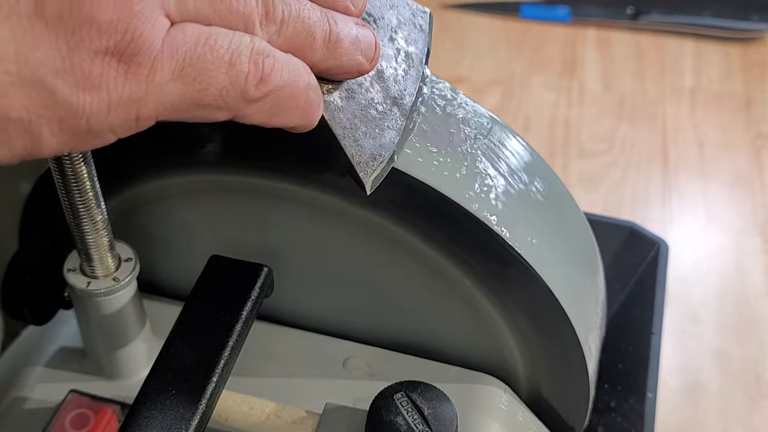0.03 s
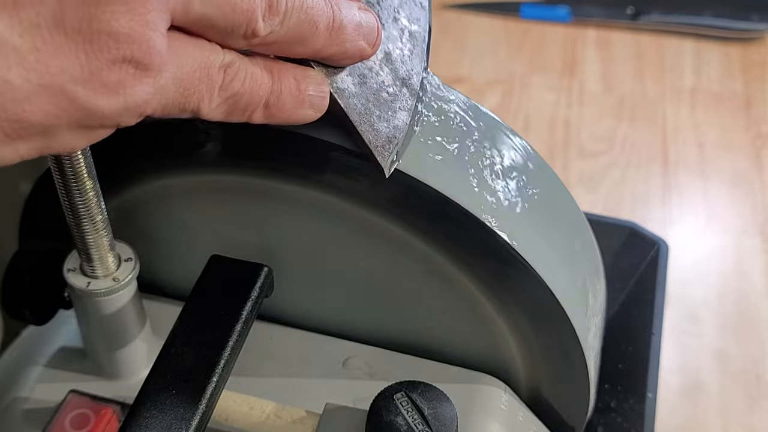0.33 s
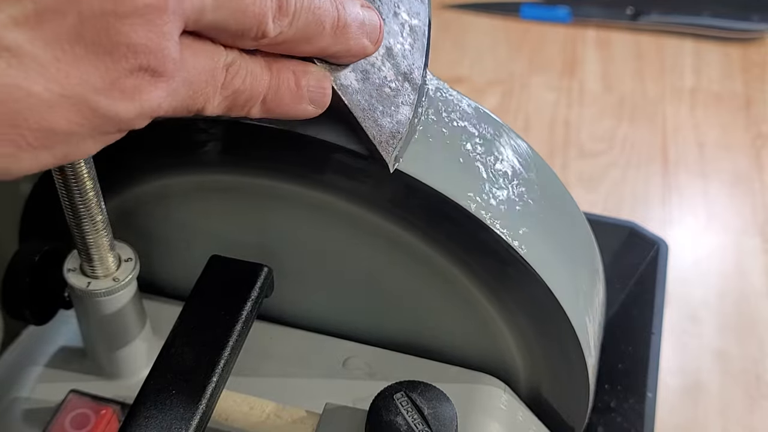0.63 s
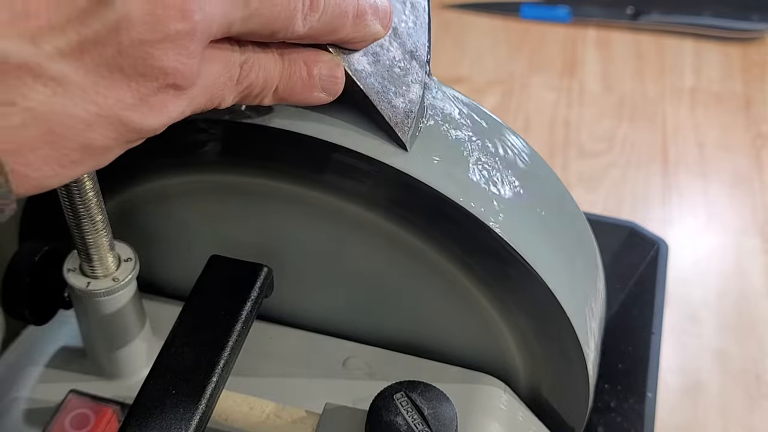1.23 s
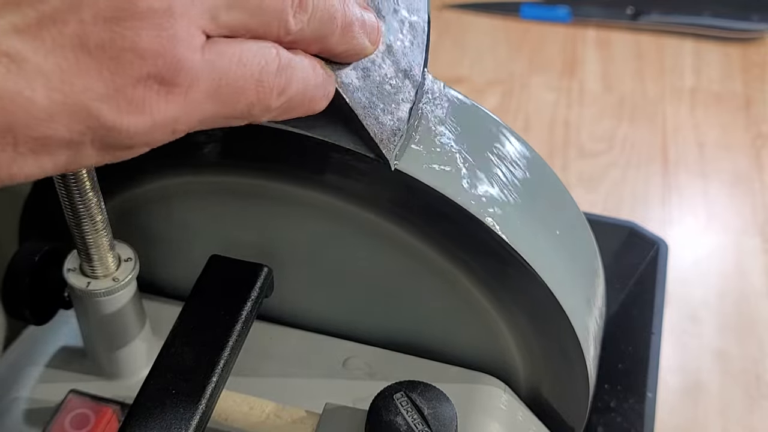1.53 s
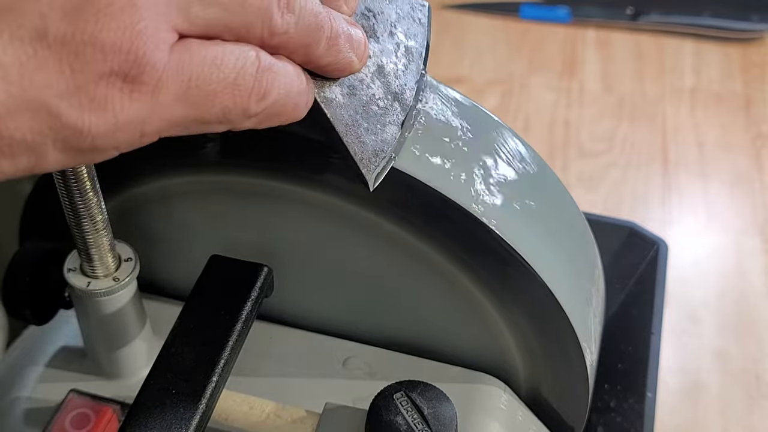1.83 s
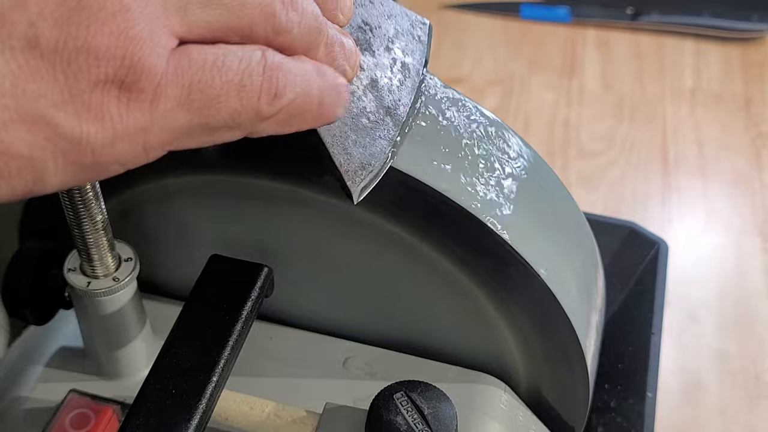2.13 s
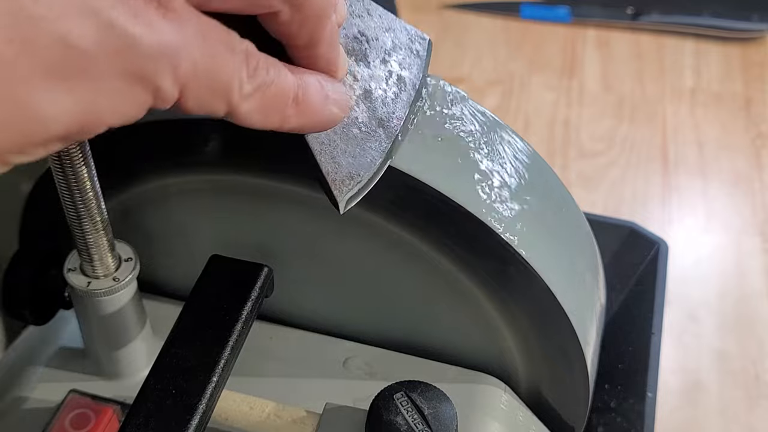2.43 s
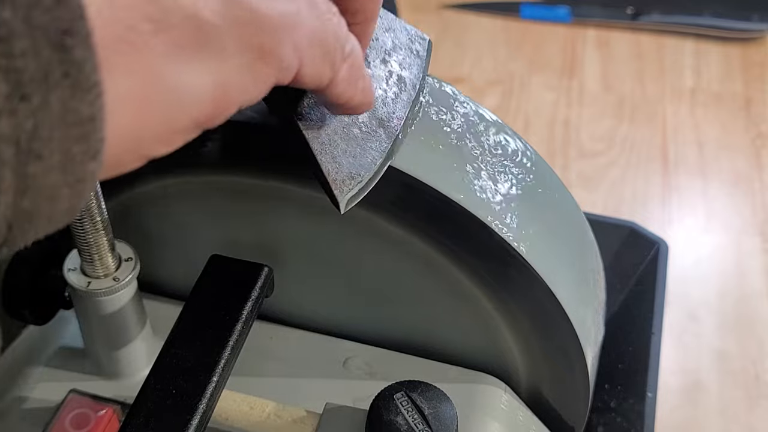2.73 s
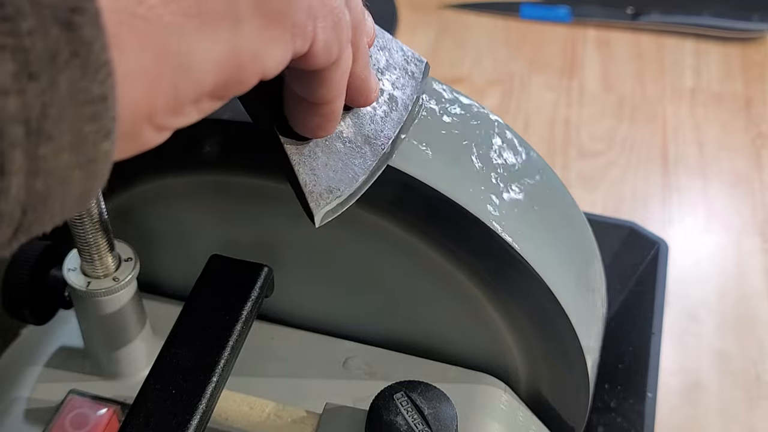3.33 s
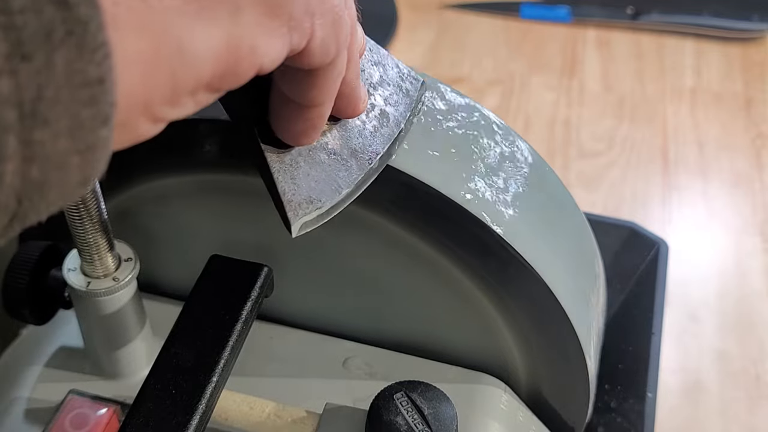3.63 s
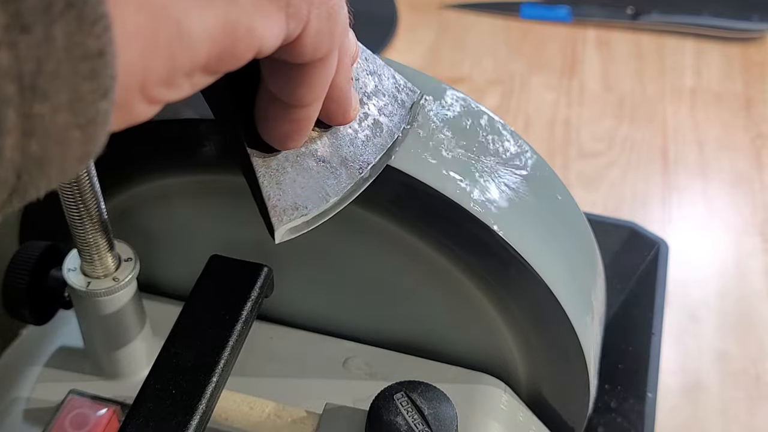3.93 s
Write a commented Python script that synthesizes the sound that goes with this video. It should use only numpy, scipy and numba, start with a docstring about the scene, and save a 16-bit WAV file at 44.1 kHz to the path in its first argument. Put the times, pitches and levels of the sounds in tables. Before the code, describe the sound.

A steel axe blade grinds continuously on a slow, wet grindstone, close by in a small workshop. The gritty hiss carries a shifting high metallic ring and a steady singing tone, while the motor hums and rumbles underneath.

```python
"""A steel axe blade held against a slow, wet grindstone, miked from close by in a small workshop.
Grit scratches the edge and rings the blade's damped modes, which swell and shift as the hand moves
the contact. The same scraping rasps in the stone, makes the tool rest ring and sing, and shakes
housing and bench. The motor hums and whines underneath."""
import sys
import numpy as np
from scipy import signal
from scipy.fft import rfft, irfft
from scipy.io import wavfile
from scipy.ndimage import uniform_filter1d
from numba import njit

SR = 44100
rng = np.random.default_rng(int(sys.argv[2]) if len(sys.argv) > 2 else 0)


def unload_wav(signal):
    """Save mono or channel-first audio to the path in sys.argv[1] as 16-bit WAV at rate SR, clipped to [-1, 1]."""
    wavfile.write(
        sys.argv[1],
        SR,
        np.round(np.clip(np.atleast_2d(signal).T, -1, 1) * 32767).astype(np.int16),
    )


N = 176400

# The blade's modes. Each entry: frequency in Hz.
BLADE_HZ = [3080, 3250, 4210, 5120, 6350, 6850, 7900, 8290, 11700, 12080, 12620, 13930, 14850]
# The same modes at the microphones. Each row: name of the level curve, width in Hz, trim in dB,
# left over right in dB, left lead in radians, likeness of the two sides from 0 to 1.
BLADE_MODES = [("11k", 330, -8, 11, 0.69, 0.58), ("3k", 304, -0.35, 0.36, -3, 0.89),
               ("4k", 236, -0.33, 1, -2.7, 0.92), ("rasp", 210, -14.5, 1.6, -4.9, 0.63),
               ("hiss", 600, 1.5, 4, -.5, 0.6), ("7k", 310, 0, 13.5, -1, 0.92),
               ("8k", 280, 0.3, 20, -2.1, 0.45), ("hiss", 290, 0, 8.2, -.3, 0.44),
               ("11k", 370, -3.5, -2.5, -2.5, 0.33), ("12k", 280, -.3, -6.5, -1.5, 0.75),
               ("12k", 750, -5, -6, -1.6, 0.7), ("hiss", 170, -1.9, 1, 2, 0.23),
               ("11k", 300, -12, 3.8, -1.6, .2)]
# Mode levels as the contact moves. Each row: time in seconds, level in dB before trim.
LEVEL_3K = [(0, -40), (.5, -46), (1.2, -44.5), (1.7, -48.5), (2.4, -43), (3.05, -47.5), (3.3, -41.5),
            (4.0, -45)]
LEVEL_4K = [(0, -47), (.3, -49), (.4, -39.5), (1.2, -38.5), (2.0, -45), (2.35, -54.5), (3.1, -49.5),
            (3.4, -41.5), (4.0, -35)]
LEVEL_7K = [(0.0, -27.5), (0.4, -35.5), (0.5, -42), (0.8, -54), (1.0, -34.5), (1.52, -40), (1.72, -59),
            (1.88, -37.5), (2.12, -27.5), (2.56, -26.5), (2.6, -29), (3.32, -37.5), (3.4, -53), (3.56, -38),
            (3.99, -31)]
LEVEL_8K = [(0.0, -37), (0.42, -36.5), (0.48, -51), (0.84, -44.5), (1.85, -48), (2.36, -30.5), (3.0, -42),
            (3.16, -38), (3.2, -48), (3.99, -45)]
LEVEL_11K = [(0.0, -39.5), (0.2, -40), (0.96, -38), (1.44, -43), (2.12, -39), (2.32, -39.5), (2.5, -40),
             (3.36, -41), (3.99, -40.5)]
LEVEL_12K = [(0.0, -51), (0.2, -39), (0.4, -35.0), (1.48, -51), (1.88, -33.5), (2.12, -34.5), (2.32, -52),
             (2.45, -36), (2.68, -34), (3.05, -39.5), (3.4, -32.5), (3.6, -38), (3.99, -26.5)]
# The contact bends some modes. Each row: time in seconds, pitch in Hz; only the swing about the mean counts.
BEND_3K = [(0, 3280), (1.2, 3140), (2.2, 3310), (4.0, 3240)]
BEND_4K = [(0, 4140), (.3, 4150), (.45, 4250), (1.75, 4300), (1.95, 4080), (3.2, 4100), (3.55, 4320),
           (4.0, 4400)]
BEND_7K = [(0, 6980), (.6, 6690), (1.4, 6830), (1.85, 6760), (2.35, 6960), (3.0, 6920), (3.55, 6700),
           (4.0, 7180)]
BEND_12K = [(0, 12120), (.6, 12150), (1.0, 11850), (1.5, 11780), (1.85, 12200), (2.3, 12080), (2.8, 12180),
            (3.4, 12130), (3.62, 11900), (4.0, 12400)]
# Wet hiss, stone rasp, tool rest and housing. Each row: time in seconds, level in dB before trim.
HISS_LEVEL = [(0.0, -51), (0.56, -54), (1.0, -50.5), (1.72, -53.5), (1.96, -47), (3.04, -56.5), (3.99, -38)]
RASP_LEVEL = [(0.0, -46.5), (0.32, -52), (0.4, -42), (0.66, -45.5), (1.32, -40.5), (1.48, -48.5),
              (3.12, -48.5), (3.99, -38.5)]
REST_LEVEL = [(0.0, -40), (.64, -37), (1.32, -39), (1.7, -40), (2.5, -38), (2.75, -35.5), (3.1, -40.5),
              (3.33, -33), (3.52, -43), (3.99, -41.5)]
RUMBLE_LEVEL = [(0.0, -34.5), (0.28, -35.5), (1.8, -38), (2.15, -36), (2.35, -32), (2.55, -38),
                (3.44, -36.5), (3.99, -40.5)]
# Tone colour of hiss, stone, housing and bench. Each row: frequency in Hz, relative gain in dB.
HISS_COLOUR = [(1500, -32), (2000, 13.5), (2500, -7), (3000, -24), (5200, 11), (8200, 11), (9300, -19),
               (10600, 5.5), (13000, 0), (15800, -6)]
RASP_COLOUR = [(700, -16), (900, -8), (990, 10), (1060, 4), (1140, 8.5), (1290, 7.5), (1370, 10),
               (1470, -1.5), (1580, 3), (1750, -6), (2600, -18)]
RUMBLE_COLOUR = [(150, -40), (250, -12), (315, 5.5), (380, 4.5), (435, -1.5), (465, -6.5), (510, 0),
                 (590, -5), (630, -2), (720, -1), (850, -9), (960, -27.5)]
BENCH_COLOUR = [(20, -38), (40, -2.5), (62, 2), (105, -6.5), (140, 7), (180, -10), (230, -10), (400, -66)]
# Two mains hum tones, then the tones of the drive. Each entry: frequency in Hz.
MOTOR_HZ = [120, 240, 88, 322, 349, 425, 1127, 1368]
# The same tones at the microphones. Each row: level in dB, left over right in dB, left lead in radians.
MOTOR_TONES = [(-35.5, 3, -0.04), (-40.5, 8.5, 1.1), (-56, -2, 1), (-59, 0, -1.2), (-49.5, 35, 0.12),
               (-49, 44, 0), (-57, 4.5, 2), (-58, 35, 1.5)]

GRAINS_PER_S, GRAIN_SPREAD_DB, HARDEST_DB = 32000, 6.5, 8.5
JUDDER_HZ, JUDDER_DB, CHATTER_HZ, CHATTER_DB = 25, 1.14, 244, 1.5
SKIRT_WIDTHS = 2.57  # beyond this span a mode falls away steeply
REST_PAN_DB = 11.5  # the tool rest sits to the left
SING_HZ, SING_WANDER_HZ, SING_WAVER_DB = 771, 6, 1.8
HUM_WAVER_DB, DRIVE_WAVER_DB, DRIVE_WANDER_HZ = 0.85, 3, 4.5
ROOM_T60_S, ROOM_DB, TOP_HZ = 0.12, -2.5, 15750


def undb(db):
    """Decibels to gain."""
    return 10 ** (np.asarray(db) / 20)


def curve(rows):
    """A table's values, joined by straight lines in time."""
    seconds, values = np.array(rows).T
    return np.interp(np.arange(N) / SR, seconds, values)


def walk(hz):
    """Smooth random drift with about hz new values a second, spread 1."""
    freqs = np.fft.rfftfreq(N, 1 / SR)
    drift = irfft(rfft(rng.standard_normal(N)) * (freqs > 0) / (1 + (2 * freqs / hz) ** 2), N)
    return drift / drift.std()


def colour(x, points):
    """Shape a sound by (Hz, dB) points."""
    hz, db = np.array(points).T
    gain_db = np.interp(np.log(np.fft.rfftfreq(N, 1 / SR) + 1), np.log(hz), db)
    return irfft(rfft(x) * undb(gain_db), N)


@njit
def ring(x, hz, width_hz):
    """A damped resonance whose centre may move."""
    out, state = np.empty(len(x)), 0j
    decay = np.exp(-np.pi * width_hz / SR)
    for i in range(len(x)):
        state = state * decay * np.exp(2j * np.pi * hz[i] / SR) + x[i]
        out[i] = state.real
    return out


def mode(pair, hz, width_hz):
    """A resonance with steep outer skirts, for each of two excitations."""
    hz = hz * np.ones(N)
    return np.array([ring(ring(x, hz, float(width_hz)), hz, width_hz * SKIRT_WIDTHS) for x in pair])


def place(pair, pan_db, lead, alike):
    """Mix two unrelated sounds onto the left and right microphones at rms 1; lead is in radians."""
    lagged = irfft(rfft(pair[0]) * np.exp(-1j * lead), N)
    right = alike * lagged + np.sqrt(1 - alike ** 2) * pair[1]
    out = np.array([pair[0] * undb(pan_db), right])
    return out / out.std()


def grit(bite):
    """Two streams of tiny grain strikes of uneven hardness, scaled by the bite of the edge."""
    hits = rng.random((2, N)) < GRAINS_PER_S / SR
    strikes = hits * rng.standard_normal((2, N))
    hardness_db = np.minimum(GRAIN_SPREAD_DB * rng.exponential(size=(2, N)), HARDEST_DB)
    return bite * strikes * undb(hardness_db)


def wet_hiss(bite):
    """The edge scrapes over wet stone with a broad hiss."""
    hiss = place(colour(grit(bite), HISS_COLOUR), pan_db=3.5, lead=np.pi, alike=0.14)
    return hiss * undb(curve(HISS_LEVEL) + 0.5)


def blade(bite):
    """Grit rings the steel, damped by the fingers; the moving contact bends some modes."""
    levels = {"rasp": RASP_LEVEL, "hiss": HISS_LEVEL, "3k": LEVEL_3K, "4k": LEVEL_4K,
              "7k": LEVEL_7K, "8k": LEVEL_8K, "11k": LEVEL_11K, "12k": LEVEL_12K}
    bends = {"3k": curve(BEND_3K), "4k": curve(BEND_4K), "7k": curve(BEND_7K), "12k": curve(BEND_12K)}
    out = np.zeros((2, N))
    for hz, (name, width_hz, trim_db, pan_db, lead, alike) in zip(BLADE_HZ, BLADE_MODES):
        bend = bends.get(name, 0)
        steel = mode(grit(bite), hz + bend - np.mean(bend), width_hz)
        out += place(steel, pan_db, lead, alike) * undb(curve(levels[name]) + trim_db)
    return out


def workshop(x):
    """The close sound plus short, dense reflections off bench and walls."""
    t = np.arange(SR // 2) / SR
    tail = rng.standard_normal((2, len(t))) * undb(-60 * t / ROOM_T60_S)
    tail /= np.sqrt((tail ** 2).sum(axis=1, keepdims=True))
    return x + undb(ROOM_DB) * signal.fftconvolve(x, tail, axes=1)[:, :N]


def stone_rasp(bite):
    """The scraping rasps low in the stone, left of centre."""
    rasp = place(colour(grit(bite), RASP_COLOUR), pan_db=7, lead=1.52, alike=1)
    return rasp * undb(curve(RASP_LEVEL) + 0.5)


def rest_ring(bite):
    """The scraping rings one narrow mode of the tool rest."""
    ringing = place(mode(grit(bite), hz=787, width_hz=44), REST_PAN_DB, lead=-0.22, alike=0.39)
    return ringing * undb(curve(REST_LEVEL) - 2.5)


def rumble():
    """Grinding shakes the housing on the left and, deeper and fainter, the bench on the right."""
    housing = place(colour(grit(1), RUMBLE_COLOUR), pan_db=10, lead=1.67, alike=1)
    bench = place(colour(grit(1), BENCH_COLOUR), pan_db=-8, lead=0, alike=0.52)
    return housing * undb(curve(RUMBLE_LEVEL) + 1) + bench * undb(-47)


def rest_singing():
    """Friction keeps the tool rest sounding as a nearly clean, slightly wandering tone."""
    phase = 2 * np.pi * np.cumsum(SING_HZ + SING_WANDER_HZ * walk(30.5)) / SR
    tone = np.array([undb(REST_PAN_DB) * np.sin(phase), np.sin(phase)])
    tone *= undb(SING_WAVER_DB * walk(26))
    return tone / tone.std() * undb(curve(REST_LEVEL) - 3.5)


def motor():
    """Mains hum holds its pitch; the weaker tones of the drive wander and waver."""
    out = np.zeros((2, N))
    for k, (hz, (db, pan_db, lead)) in enumerate(zip(MOTOR_HZ, MOTOR_TONES)):
        waver_db, wander_hz = (HUM_WAVER_DB, 0) if k < 2 else (DRIVE_WAVER_DB, DRIVE_WANDER_HZ)
        phase = 2 * np.pi * np.cumsum(hz + wander_hz * walk(8.9)) / SR
        tone = np.array([undb(pan_db) * np.sin(phase + lead), np.sin(phase)])
        tone *= undb(waver_db * walk(12.7))
        out += tone / tone.mean(axis=0).std() * undb(db)
    return out


def scene():
    """Close to the wheel: the edge bites unevenly into the turning stone while the motor runs."""
    judder = walk(JUDDER_HZ)
    judder -= uniform_filter1d(judder, size=SR // 16)  # keep only the quick shake
    bite = undb(JUDDER_DB * judder + CHATTER_DB * walk(CHATTER_HZ))
    edge = workshop(wet_hiss(bite) + blade(bite))
    return edge + stone_rasp(bite) + rest_ring(bite) + rumble() + rest_singing() + motor()


def record(dry):
    """The recorder cuts the treble steeply above TOP_HZ."""
    return signal.sosfilt(signal.ellip(10, .2, 80, TOP_HZ, fs=SR, output="sos"), dry)


dry = scene()
out = record(dry)
unload_wav(out)
```